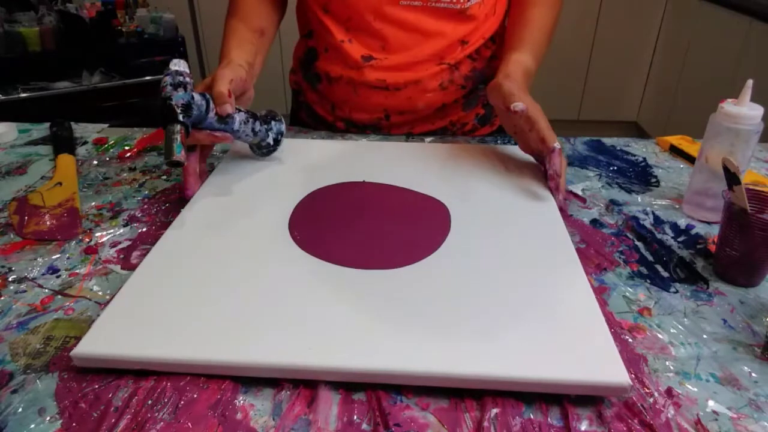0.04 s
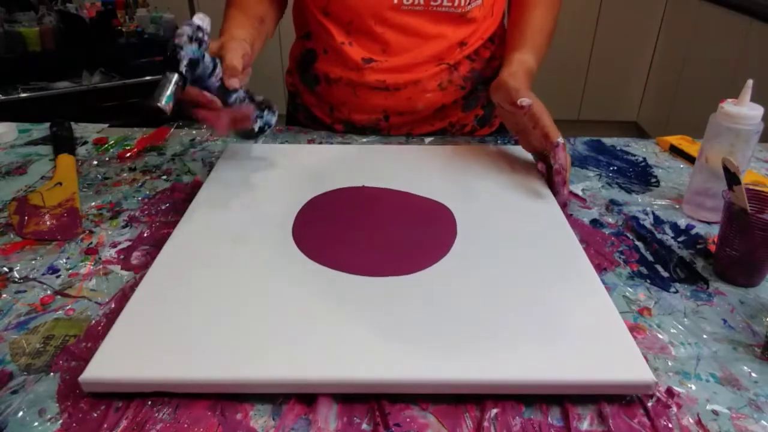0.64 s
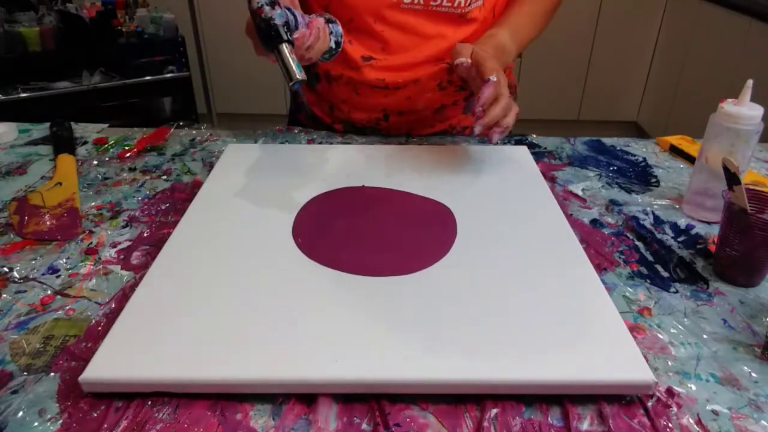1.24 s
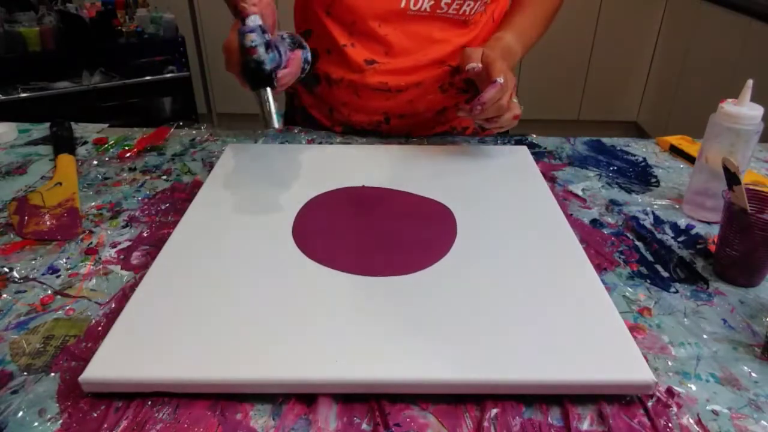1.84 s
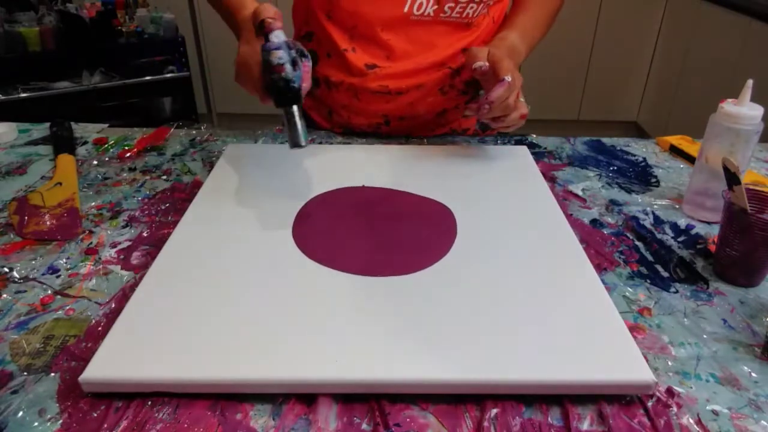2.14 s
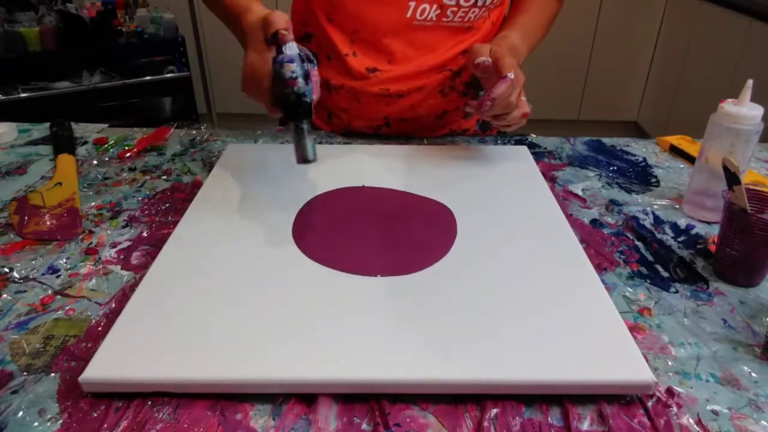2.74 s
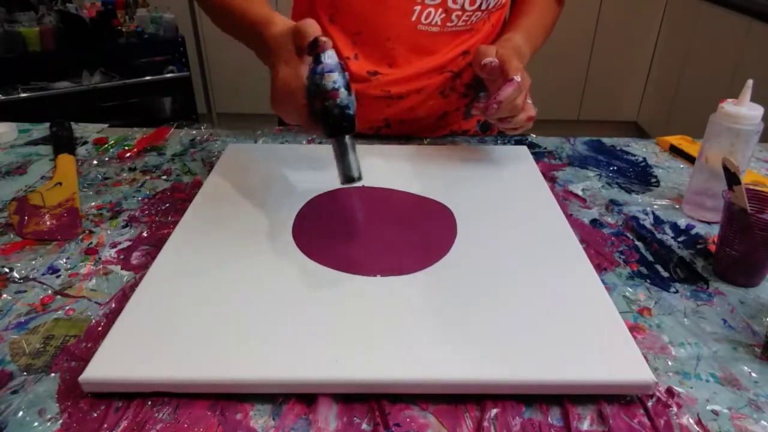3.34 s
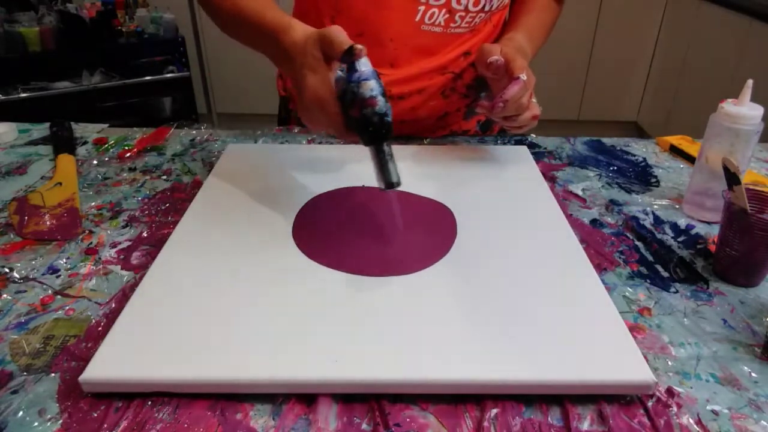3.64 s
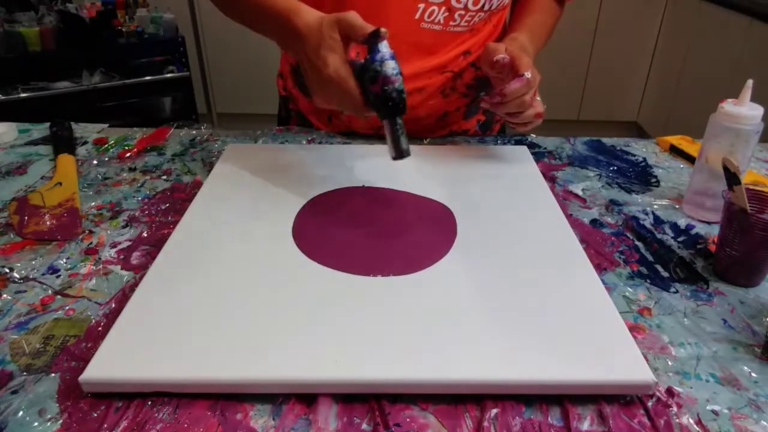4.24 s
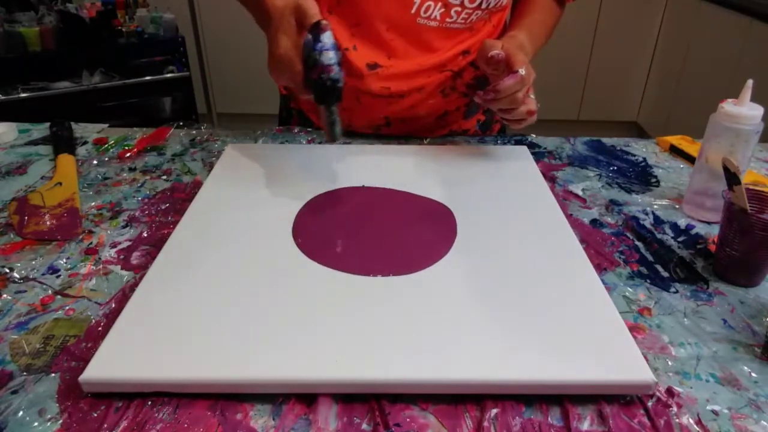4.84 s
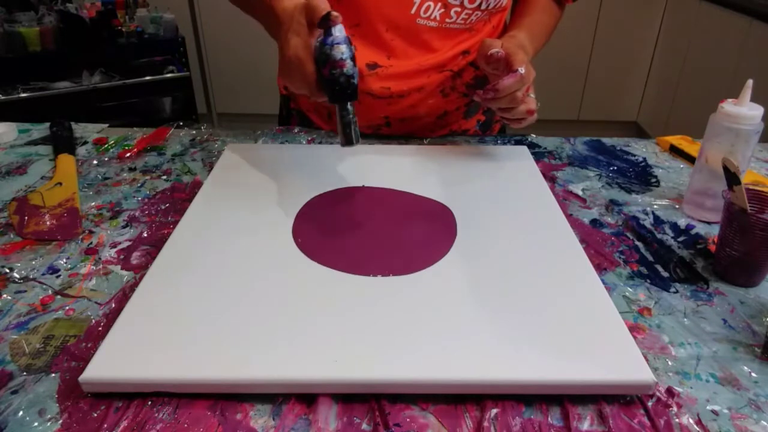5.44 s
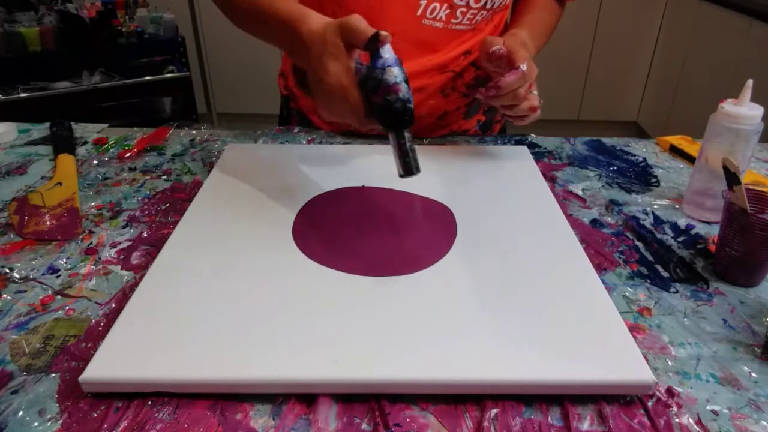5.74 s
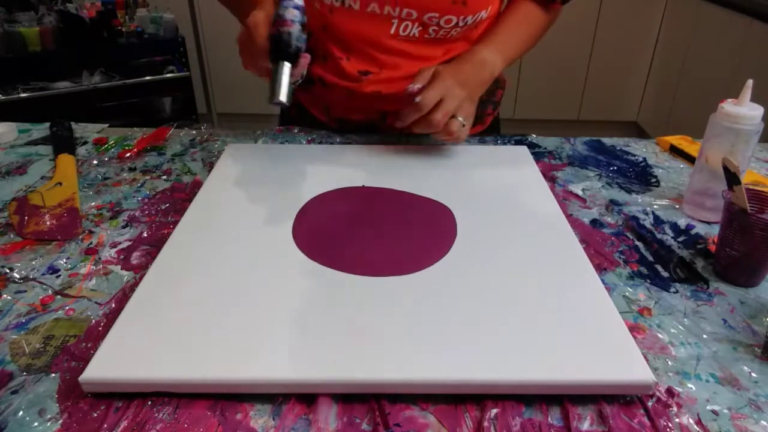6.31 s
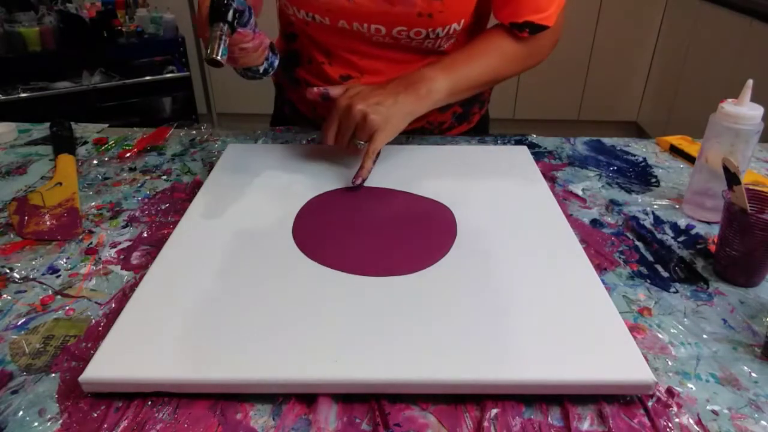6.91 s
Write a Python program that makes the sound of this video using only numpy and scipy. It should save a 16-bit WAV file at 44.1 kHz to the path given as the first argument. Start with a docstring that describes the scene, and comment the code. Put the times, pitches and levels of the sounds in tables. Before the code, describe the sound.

After light handling clicks, a small gas torch ignites with a sharp snap, burns with a sputtering, whistling hiss, then cuts out.

```python
"""Gas torch over a canvas

A small torch is picked up, a canvas is set down, the valve opens and the piezo igniter snaps.
Gas hisses and whistles from a steel nozzle; the flame roars, flutters as it is swept about and spits.
The valve wheezes shut. A small hard-walled room answers."""
import sys
import numpy as np
from scipy import signal
from scipy.fft import rfft, irfft, next_fast_len
from scipy.io import wavfile
from scipy.ndimage import map_coordinates

SR = 44100
rng = np.random.default_rng(int(sys.argv[2]) if len(sys.argv) > 2 else 0)


def master_out(mix):
    """Clip the mix to full scale and print it as 16-bit PCM to the path in sys.argv[1]."""
    frames = np.transpose(np.atleast_2d(mix))
    ceiling = np.clip(frames, -1, 1)
    pcm = np.round(ceiling * 32767).astype(np.int16)
    wavfile.write(sys.argv[1], SR, pcm)


N = 311787

# steady flame: t/s, deep roar/dB, upper roar/dB, hiss/dB, whistle/dB
FLAME_LEVELS = [(1.25, -53.5, -53.5, -52, -56.5), (1.84, -54, -53.5, -55, -62),
                (2.4, -51, -52, -52.5, -57.5), (3.12, -49, -52, -50, -58.5), (3.6, -50.5, -51, -51, -52.5),
                (4.37, -48.5, -55, -51, -54), (4.75, -47.5, -52, -51, -58.5), (5.33, -49, -54, -51.5, -68),
                (5.63, -50.5, -48.5, -49.5, -47.5), (5.8, -57, -50.5, -48, -51),
                (5.95, -51.5, -52, -49, -55), (6.18, -52, -53.5, -50.5, -57)]
# flame tears: t/s, length/s, level/dB
FLUTTERS = [(2.117, 0.0071, -46), (2.692, 0.0071, -39.5), (2.853, 0.0058, -43.5), (2.876, 0.0081, -44),
            (3.016, 0.0048, -47), (3.044, 0.0048, -46), (3.186, 0.027, -35.5), (3.216, 0.022, -38),
            (3.239, 0.018, -34.5), (3.27, 0.018, -58), (3.332, 0.061, -44), (3.408, 0.021, -40),
            (3.79, 0.02, -42), (3.809, 0.018, -36.5), (3.83, 0.034, -40), (3.938, 0.012, -49),
            (3.96, 0.0089, -38), (4.02, 0.0084, -40), (4.04, 0.032, -47), (4.191, 0.012, -47.5),
            (4.383, 0.013, -50), (4.44, 0.044, -49), (4.588, 0.024, -47.5), (4.829, 0.0099, -44),
            (5.103, 0.0096, -49), (5.209, 0.0076, -45), (5.384, 0.026, -38.5), (5.413, 0.034, -36.5),
            (5.472, 0.022, -44), (5.506, 0.011, -38.5), (5.6, 0.025, -40), (5.625, 0.035, -37.5),
            (5.667, 0.033, -48), (5.722, 0.0089, -41), (5.81, 0.017, -50), (5.832, 0.011, -38),
            (5.922, 0.019, -40), (5.94, 0.012, -37), (6.012, 0.041, -43), (6.105, 0.039, -51),
            (6.198, 0.099, -43)]
# strong spits: t/s, crack/dB, ping/dB, tube ring/dB
SPITS = [(1.8062, -31, -36, -38), (2.0316, -32.5, -45, -30), (2.2465, -34, -35, -37),
         (2.617, -38, -47, -32), (2.801, -30, -24.5, -24), (2.9805, -32, -29, -19), (3.154, -33, -47, -30),
         (3.3635, -27.5, -36, -31), (3.552, -38, -46, -26), (3.747, -30.5, -45, -42),
         (3.9726, -21.5, -25, -20), (4.393, -42, -48, -38), (4.836, -40, -42, -32), (5.032, -33, -42, -22),
         (5.22, -35, -40, -34), (5.6418, -28.5, -53, -36), (6.0457, -32, -48, -37)]
# whistle pitch, sagging with the pressure: t/s, f/Hz
WHISTLE_PITCH = [(3.5, 4770), (4.5, 4783), (5.4, 4850), (5.7, 4770), (6.0, 4840), (6.22, 4560),
                 (6.42, 4350)]
# finger and trigger contacts: t/s, tick/dB, knock/dB, knock f/Hz
CLICKS = [(0.047, -47, -41.5, 4200), (.062, -42.5, -55, 4000), (.07, -41.5, -44, 4000),
          (0.122, -51.5, -51, 3500), (.183, -59, -60, 4000), (0.22, -61, -49, 1730),
          (0.254, -55, -42.5, 4100), (0.274, -55, -54, 2490), (.599, -42, -46, 2170),
          (0.73, -35, -35, 1340), (0.891, -46, -35, 1300), (0.905, -34, -46, 2600),
          (0.947, -34.5, -45, 2200), (6.49, -63, -71, 3520), (6.614, -64, -67, 4500)]
# hand slides: t/s, length/s, level/dB
RUBS = [(.035, 0.086, -61), (.14, 0.1, -70), (.44, 0.044, -65), (.591, 0.041, -50.5), (.665, 0.022, -57),
        (.718, 0.009, -55), (.875, 0.024, -51.5), (6.6, 0.14, -78)]
# canvas bumps: t/s, cloth boom/dB, frame knock/dB
BUMPS = [(0.402, -41, -42), (.445, -41.5, -61), (.472, -40, -50.5), (0.516, -46, -56.5), (6.614, -64, -68)]

# noise spectra: f/Hz, relative density/dB
ROAR_SPECTRUM = [(18, -68), (30, -35.5), (80, -16.5), (128, 4), (190, 0.5), (335, 1), (363, -11),
                 (409, -4.5), (596, -7.5), (771, -6), (1080, -17), (1310, -13), (1510, -17), (2030, -20.5),
                 (2730, -25), (3400, -38), (4420, -57), (7480, -120)]
RASP_SPECTRUM = [(40, -44.5), (130, -0.5), (300, 3.5), (400, -6.5), (800, 1), (1000, -5), (1250, -0.5),
                 (1800, -4.5), (2700, -12), (4000, -7.5), (7400, -11.5), (8700, -23), (15000, -16)]
JET_SPECTRUM = [(500, -15.5), (2700, -7.5), (3300, -19), (3900, -7), (4400, 5), (4800, 4), (5200, 4.5),
                (5650, -7.5), (6450, 0), (7000, -19.5), (8600, -25), (9900, -4), (10800, -2.5),
                (12100, 2.5), (13000, -3), (13600, -3), (15400, 2), (16000, -10.5)]
SPIT_SPECTRUM = [(300, -11), (3200, -3.5), (4400, 9.5), (5500, 6.5), (6100, 6), (6700, 5), (7900, 5.5),
                 (8900, -3), (11000, 0), (11700, 0), (12600, 8.5), (15700, -3)]
SNAP_SPECTRUM = [(530, -45.5), (900, -19), (1150, -20), (1250, -11.5), (1570, -7.5), (1850, -15.5),
                 (2090, -1.5), (2270, -11), (2600, -9.5), (3300, -1.5), (3820, -9.5), (5160, -1.5),
                 (6030, -9), (6640, -2.5), (7310, -3), (7960, -1), (9090, -17), (10600, -0.5), (12300, -8),
                 (14200, -2.5), (16000, -21)]
TICK_SPECTRUM = [(530, -38.5), (900, -23), (1360, -13), (1810, -2.5), (2040, -11), (3110, -7), (4460, -1),
                 (7230, -2), (8980, -12), (11800, -5), (16000, -13)]
RUB_SPECTRUM = [(700, -24), (1500, -11.5), (2300, -6), (3200, -7.5), (4600, -0.5), (7300, -4), (8800, -18),
                (12000, -11.5), (16000, -12.5)]
AIR_SPECTRUM = [(15, -22), (25, -3), (33, -8), (92, 4.5), (326, -9.5), (516, -13), (575, -14),
                (1400, -18.5), (3520, -21.5), (4140, -21), (9570, -27.5), (14800, -18), (16000, -28.5)]

# resonances: f/Hz, width/Hz, relative level/dB
FLUTTER_MODES = [(775, 62, -6), (1166, 60, 0), (1305, 70, -0.5), (1694, 63, -3), (2600, 400, -6.5)]
NOZZLE_MODES = [(6310, 240, -11.5), (9830, 190, -8), (12030, 200, 0.5), (13340, 180, -3)]
VALVE_MODES = [(4100, 440, -2), (4780, 400, -0.5), (5880, 550, -0.5)]
CASE_MODES = [(1520, 170, -6), (2170, 300, 3), (2750, 350, 0), (3350, 160, 3), (3700, 380, 1),
              (5050, 290, 5.5), (6860, 460, 0.5), (7720, 300, 2.5), (10500, 730, -1.5), (12500, 300, 2.5),
              (14000, 600, -5.5)]
CANVAS_MODES = [(104.8, 25, 4.5), (142, 35, 4), (173, 25, -1.5), (320, 30, -5.5), (510, 70, -12),
                (684, 38, -4)]
FRAME_MODES = [(348, 78, -7.5), (603, 64, -1.5), (730, 81, -2.5), (1520, 210, -5)]

# steel tube partials: f/Hz, relative level/dB
TUBE_PARTIALS = [(4760, -10), (5520, -4), (6500, -15), (7350, -17), (7920, -18), (11900, -5),
                 (13000, -11.5)]
# room decay: f/Hz, T60/s
ROOM_T60 = [(100, 0.59), (500, 0.5), (2000, 0.57), (6000, 0.41), (11000, 0.34), (16000, 0.3)]

TIME_S = np.arange(N) / SR
OPEN_S, SPARK_S, SHUT_S = 0.94, 1.0278, 6.285


def torch():
    """The jet hisses, and burns after the spark; both follow the gas flow."""
    lit = np.clip((TIME_S - SPARK_S) / 0.026, 0, 1)
    return gas_flow() * (jet() + lit * flame())


def flame():
    """Burning gas roars; it surges and rasps whenever the flame tears."""
    deep_db, upper_db, _, _ = curves(FLAME_LEVELS)
    burn = noise(ROAR_SPECTRUM)
    upper = highpass(burn, 340)
    roar = amp(1.7 * wobble(28)) * (amp(deep_db + 0.5) * (burn - upper) + amp(upper_db + 4) * upper)
    surges = amp(-5) * strokes(FLUTTERS, rise_s=0.007, fall_s=0.029) * highpass(noise(ROAR_SPECTRUM), 330)
    flutters = strokes(FLUTTERS, rise_s=0.0098, fall_s=0.0046)
    calm = amp(deep_db - 14.5 + 4.6 * wobble(35))
    tearing = calm + np.hypot(flutters, amp(-64) * pushes())
    lumps = unit(amp(2.9 * wobble(300)))  # the torn front burns unevenly
    rasp = lumps * noise(RASP_SPECTRUM)
    hollow = bend(ringing(FLUTTER_MODES), 1 + 0.02 * wobble(12))  # a hollow colouring that shifts slightly
    return roar + surges + tearing * (rasp + amp(-4) * hollow)


def jet():
    """Gas hisses and sings in the nozzle."""
    _, _, hiss_db, _ = curves(FLAME_LEVELS)
    song = unit(sum(amp(db) * nozzle_mode(hz, width_hz) for hz, width_hz, db in NOZZLE_MODES))
    return amp(hiss_db - 0.5 + 0.87 * wobble(13)) * (noise(JET_SPECTRUM) + amp(-0.7) * song)


def nozzle_mode(hz, width_hz):
    """One resonance, rms 1, swelling and drifting as the torch moves."""
    swell = amp(2.6 * wobble(12))
    mode = ringing([(hz, width_hz, 0)])
    drift = 1 + 0.008 * (wobble(4.3) + wobble(1.5))
    return unit(swell * bend(mode, drift))


def gas_flow(opening_s=0.07, gush_db=15, gush_s=0.1, shut_db_per_s=161.5):
    """Pent-up gas gushes out; the flow pulses with each spit and dies once the valve shuts."""
    since_open_s = np.maximum(TIME_S - OPEN_S, 0)
    since_shut_s = np.maximum(TIME_S - SHUT_S, 0)
    level_db = gush_db * np.exp(-since_open_s / gush_s) - shut_db_per_s * since_shut_s
    return np.clip(since_open_s / opening_s, 0, 1) * amp(level_db) * (1 + amp(-10.5) * pushes())


def pushes(lead_s=0.026, length_s=0.016):
    """Envelope of the push of gas just ahead of each spit."""
    return strokes([(s - lead_s, length_s, 0) for s, _, _ in spit_train()], rise_s=0.013, fall_s=0.047)


def spits(ring_t60_s=0.032, ping_hz=14020):
    """Each spit cracks in the nozzle and pings; strong ones also ring the steel tube."""
    train = spit_train()
    crack = blows([(s, db) for s, db, _ in train], attack_s=0.0016, t60_s=0.02)
    ring = blows([(s, db) for s, _, _, db in SPITS], attack_s=0.0023, t60_s=ring_t60_s)
    ping = blows([(s, db) for s, _, db in train], attack_s=0.0015, t60_s=ring_t60_s)
    tube = sum(amp(db + 0.99 * wobble(5)) * tone(hz) for hz, db in TUBE_PARTIALS)
    return amp(5) * crack * noise(SPIT_SPECTRUM) + amp(-3) * ring * tube + amp(9) * ping * tone(ping_hz)


def spit_train(spacing_s=0.205):
    """Strong spits, with faint ones evenly spaced in the gaps: t/s, crack/dB, ping/dB."""
    rows = [row[:3] for row in SPITS]
    for (start_s, *_), (end_s, *_) in zip(SPITS, SPITS[1:]):
        beats = max(round((end_s - start_s) / spacing_s), 1)
        rows += [(start_s + (end_s - start_s) * k / beats, -40.5, -47) for k in range(1, beats)]
    return rows


def whistle(width_hz=110):
    """The jet's narrow note needs full flow, so it dies before the hiss."""
    level_db = curves(FLAME_LEVELS)[-1]
    hz, = curves(WHISTLE_PITCH)
    note = unit(bend(ringing([(hz[0], width_hz, 0)]), hz / hz[0]))
    return amp(level_db - 1) * np.minimum(gas_flow(), 1) ** 2.2 * note


def wheeze(start_s=6.21, length_s=0.092):
    """The closing valve throttles the gas to a broader hiss that sags with the whistle."""
    hz, = curves(WHISTLE_PITCH)
    envelope = strokes([(start_s, length_s, -52.5)], rise_s=0.052, fall_s=0.045)
    return envelope * bend(ringing(VALVE_MODES), hz / hz[0])


def igniter(rebound_s=0.004):
    """The piezo hammer snaps and rebounds into the case; the walls answer."""
    snap = blows([(SPARK_S, 3.5)], attack_s=0.0016, t60_s=0.0095) * noise(SNAP_SPECTRUM)
    case = blows([(SPARK_S + rebound_s, -14)], attack_s=0.00079, t60_s=0.036) * ringing(CASE_MODES)
    impulse = 1.0 * (np.arange(N) == round(SPARK_S * SR))
    pulse = filtered(impulse, lambda hz: amp(log_interp(SNAP_SPECTRUM, hz)))
    echo = amp(6) * walls(pulse / np.linalg.norm(pulse), gap_s=0.0038)
    return snap + case + echo


def ignition(thump_hz=144):
    """The gas catches with a low thump and a puff."""
    catch_s = SPARK_S + 0.0033
    swing = -np.sin(2 * np.pi * thump_hz * (TIME_S - catch_s))
    thump = blows([(catch_s, -13)], attack_s=0.018, t60_s=0.045) * swing
    puff = blows([(catch_s, -35.5)], attack_s=0.0028, t60_s=0.035) * noise(ROAR_SPECTRUM)
    return highpass(thump + puff, 60)


def handling(grip_s=0.015):
    """Hands click, knock and rub on the plastic torch; its small body radiates no bass."""
    ticks = blows([(s, db) for s, db, _, _ in CLICKS], attack_s=0.00046, t60_s=0.025)
    ticks *= noise(TICK_SPECTRUM)
    knocks = sum(blows([(s, db)], attack_s=0.0026, t60_s=0.034) * ringing([(hz, 0.21 * hz, 0)])
                 for s, _, db, hz in CLICKS)
    holding = (grip_s, SPARK_S - grip_s, -67.5)
    sliding = strokes(RUBS + [holding], rise_s=0.0096, fall_s=0.011)
    rub = sliding * amp(2.5 * wobble(200)) * noise(RUB_SPECTRUM)
    return highpass(ticks + amp(3.5) * knocks + rub, 1000, order=6)


def canvas():
    """The wooden frame drags and knocks down; the stretched cloth booms as it rocks and settles."""
    dragging = strokes([(0.0066, 0.396, -68)], rise_s=0.059, fall_s=0.046)
    drag = dragging * amp(1.2 * wobble(61.7)) * ringing(FRAME_MODES)
    body = ringing(CANVAS_MODES)
    wood = highpass(body, 240)
    boom = blows([(s, db) for s, db, _ in BUMPS], attack_s=0.005, t60_s=0.1) * unit(body - wood)
    knock = blows([(s, db) for s, _, db in BUMPS], attack_s=0.0036, t60_s=0.1) * unit(wood)
    return drag + filtered(boom + knock, lambda hz: hz ** 4 / (hz ** 4 + 75 ** 4) / (1 + (hz / 950) ** 6))


def near_reflections(x, depth_db, patch_hz, patch_s):
    """Canvas and table reflections boost or cancel shifting patches of treble as the torch moves."""
    hz, t, bins = signal.stft(x, SR, nperseg=512)
    grid = np.meshgrid(hz / patch_hz, t / patch_s, indexing="ij")
    patches = map_coordinates(rng.standard_normal((120, 120)), grid, mode="mirror")
    treble = (hz / (hz + 1800))[:, None]  # long waves hardly change
    gain = amp(depth_db * treble * np.tanh(patches))
    gain /= np.sqrt(np.mean(gain ** 2, axis=1, keepdims=True))
    return signal.istft(bins * gain, SR, nperseg=512)[1][:N]


def room(x, wet_db):
    """Direct sound plus reverberation."""
    return x + amp(wet_db) * walls(x, gap_s=0.0045)


def walls(x, gap_s):
    """The walls answer after a gap; each frequency decays at its own rate."""
    hz, t, bins = signal.stft(rng.standard_normal(SR // 2), SR, nperseg=256)
    decay = np.exp(-np.log(1000) * t / log_interp(ROOM_T60, hz)[:, None])
    tail = signal.istft(bins * decay, SR, nperseg=256)[1]
    tail = np.pad(tail / np.linalg.norm(tail), (int(gap_s * SR), 0))
    return signal.fftconvolve(x, tail)[:N]


def blows(rows, attack_s, t60_s):
    """Envelope of fast-rising, decaying blows; rows: t/s, level/dB."""
    envelope, t = np.zeros(N + SR), np.arange(SR // 2) / SR
    shape = np.exp(-np.log(1000) * t / t60_s) * (1 - np.exp(-t / attack_s))
    for s, db in rows:
        envelope[round(s * SR):][:len(t)] += amp(db) * shape
    return envelope[:N]


def strokes(rows, rise_s, fall_s):
    """Ramp, hold, exponential release; rows: t/s, length/s, level/dB."""
    return sum(amp(db) * np.clip((TIME_S - s) / rise_s, 0, 1)
               * np.exp(-np.maximum(TIME_S - s - length_s, 0) / fall_s) for s, length_s, db in rows)


def noise(spectrum):
    """Coloured noise, rms 1."""
    return unit(filtered(rng.standard_normal(N), lambda hz: amp(log_interp(spectrum, hz))))


def ringing(modes):
    """Noise through resonances of alternating sign, rms 1."""
    def response(hz):
        return sum((-1) ** k * amp(db) * 1j * hz * width_hz / (mode_hz ** 2 - hz ** 2 + 1j * hz * width_hz)
                   for k, (mode_hz, width_hz, db) in enumerate(modes))
    return unit(filtered(rng.standard_normal(N), response))


def tone(hz, waver_hz=85):
    """Wavering sine."""
    return np.sin(2 * np.pi * np.cumsum(hz + waver_hz * wobble(350)) / SR)


def wobble(rate_hz):
    """Smooth random curve."""
    knots = rng.standard_normal(int(N * rate_hz / SR) + 4)
    return map_coordinates(knots, [TIME_S * rate_hz])


def bend(x, speed):
    """Scale pitch by a speed curve."""
    return map_coordinates(x, [np.cumsum(speed)], order=5, mode="mirror")


def highpass(x, edge_hz, order=4):
    """Zero-phase high-pass."""
    return filtered(x, lambda hz: hz ** order / (hz ** order + edge_hz ** order))


def filtered(x, response):
    """Apply a frequency response."""
    size = next_fast_len(N + SR // 2)
    return irfft(rfft(x, size) * response(np.fft.rfftfreq(size, 1 / SR)), size)[..., :N]


def curves(rows):
    """Per-sample curve of each column after t/s."""
    times_s, *columns = np.transpose(rows)
    return [np.interp(TIME_S, times_s, column) for column in columns]


def log_interp(points, hz):
    """Interpolate on a log frequency axis."""
    knots_hz, values = np.transpose(points)
    return np.interp(np.log(hz + 1), np.log(knots_hz + 1), values)


def unit(x):
    """Scale to rms 1."""
    return x / np.sqrt(np.mean(x ** 2) + 1e-20)


def amp(db):
    """dB to gain."""
    return 10 ** (np.asarray(db) / 20)


def scene():
    """All sources in the room over faint air noise; both channels alike."""
    burner = room(torch() + wheeze(), wet_db=-8)
    burner = near_reflections(burner, depth_db=6.2, patch_hz=200, patch_s=0.065)
    nozzle = room(spits() + whistle(), wet_db=-11)
    lighting = igniter() + room(ignition(), wet_db=-11)
    contacts = room(handling() + canvas(), wet_db=-6.5)
    mono = burner + nozzle + lighting + contacts + amp(-72) * noise(AIR_SPECTRUM)
    return np.array([mono, mono])


def record(dry):
    """Soft peak limit, then a band-pass from 24 to 16050 Hz."""
    rounded = dry / (1 + np.abs(dry / 0.68) ** 4) ** (1 / 4)
    return filtered(rounded, lambda hz: hz ** 2 / (hz ** 2 + 24 ** 2) / (1 + (hz / 16050) ** 160))


dry = scene()
out = record(dry)
master_out(out)
```